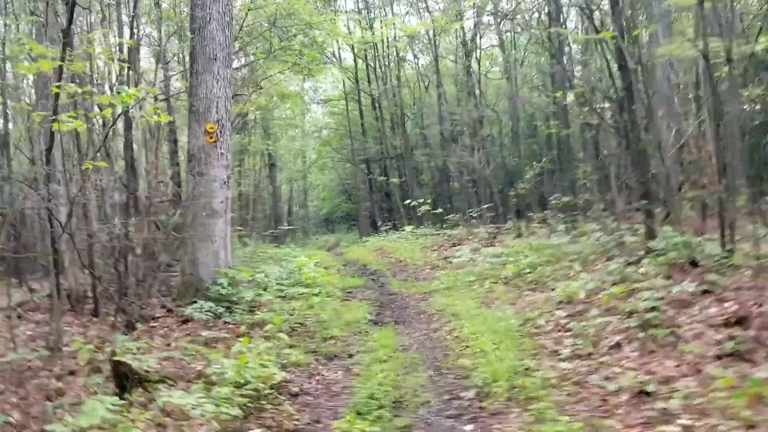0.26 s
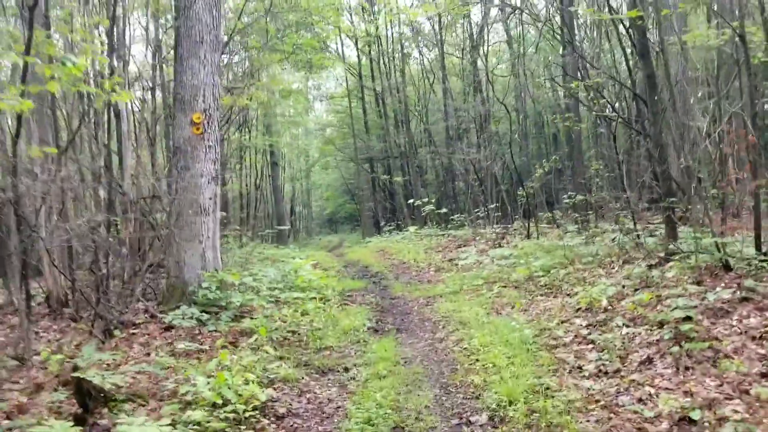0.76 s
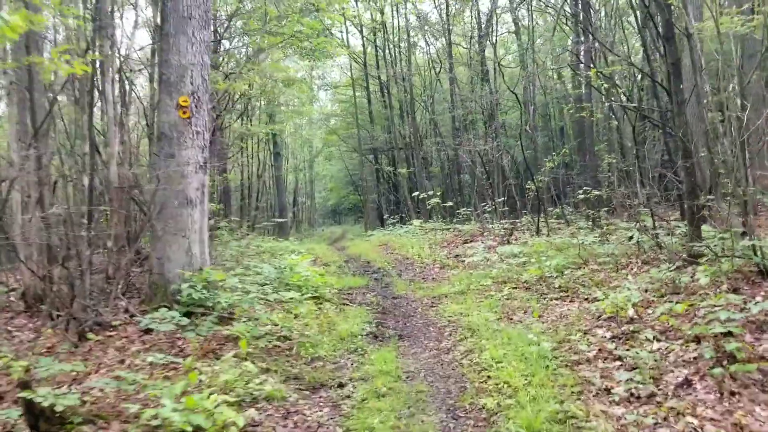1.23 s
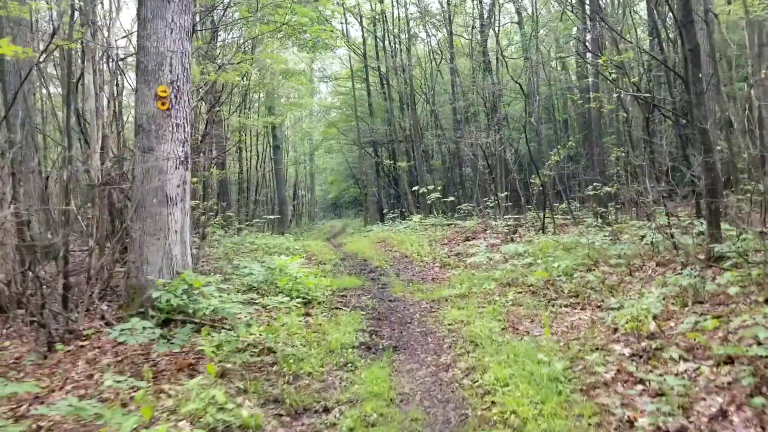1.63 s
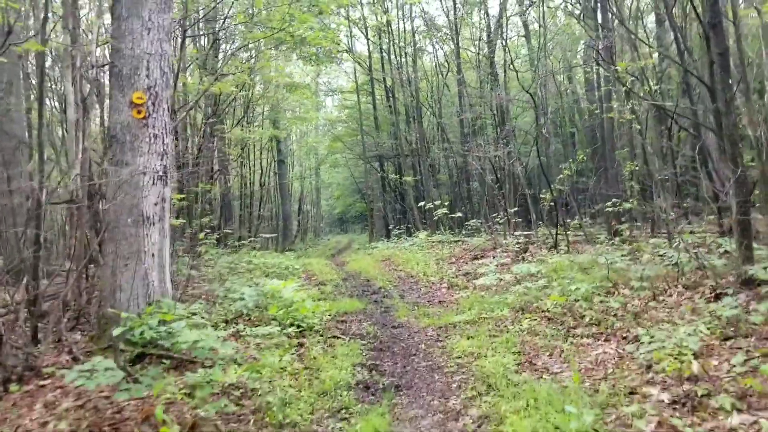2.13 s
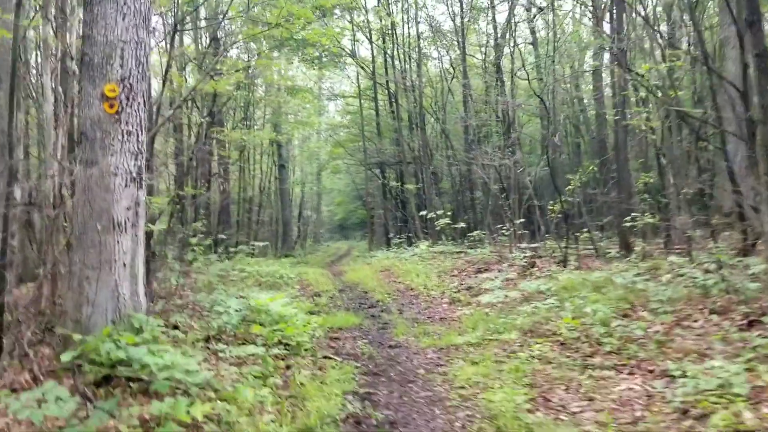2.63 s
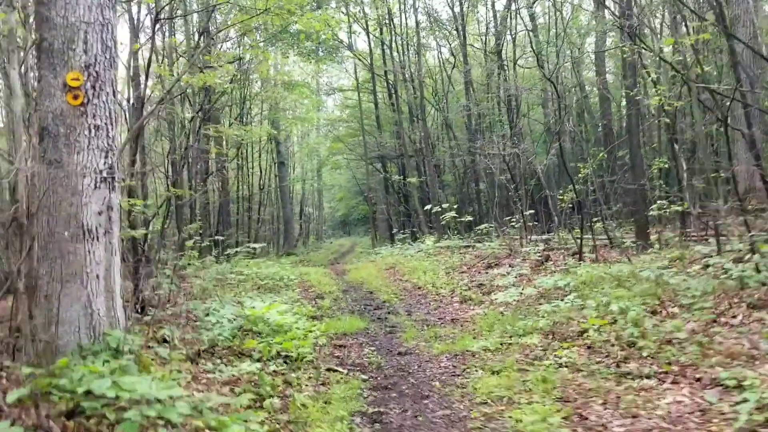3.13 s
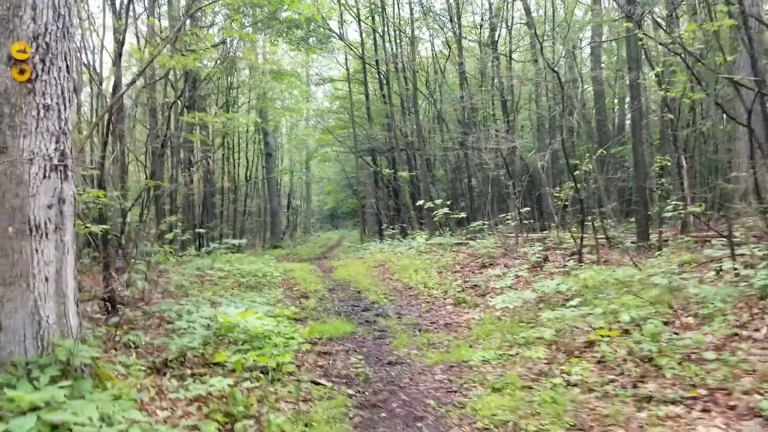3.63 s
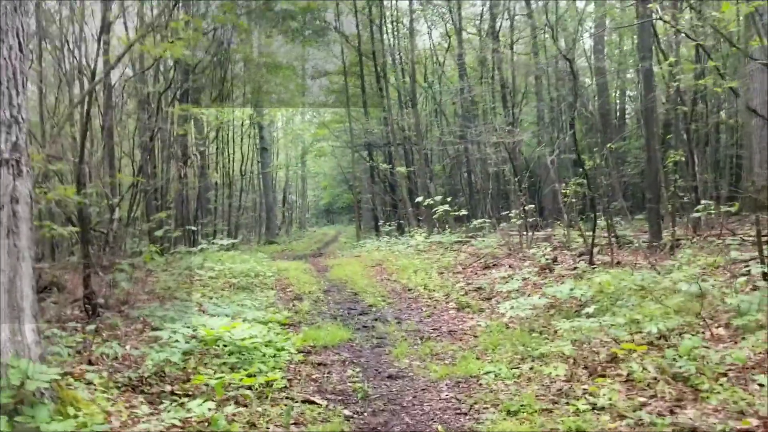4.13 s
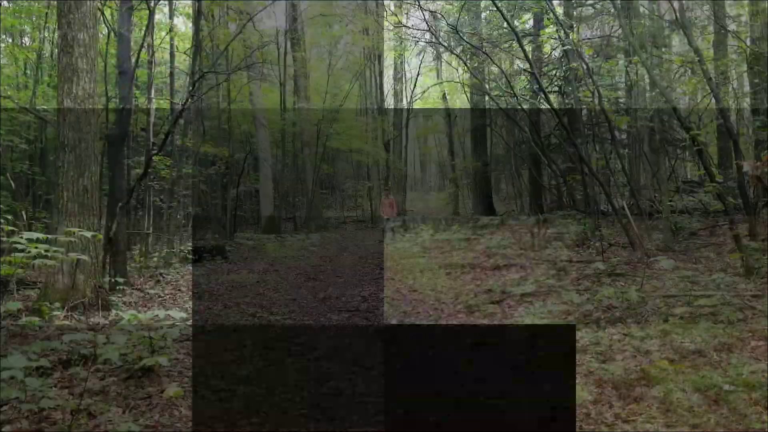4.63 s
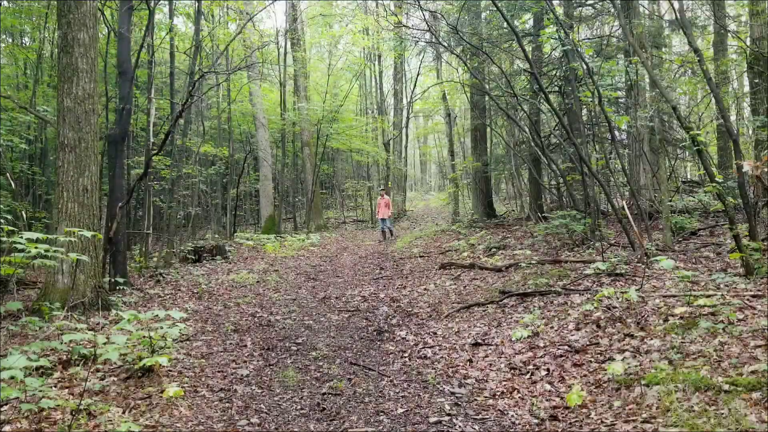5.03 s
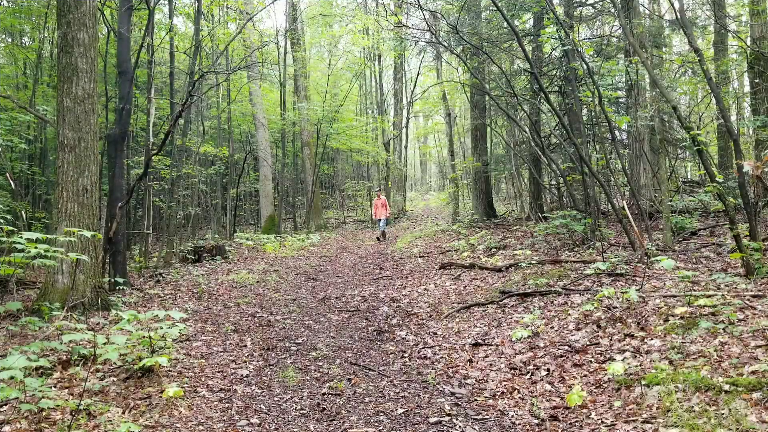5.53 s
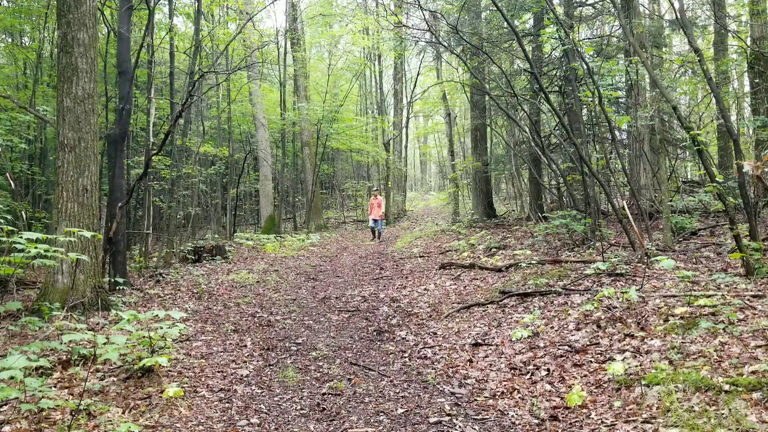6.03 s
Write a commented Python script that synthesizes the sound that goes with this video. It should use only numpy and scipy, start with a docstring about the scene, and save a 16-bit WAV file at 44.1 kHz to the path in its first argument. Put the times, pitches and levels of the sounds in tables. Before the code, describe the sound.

A walk on a damp, leafy forest trail, heard through a hand-held camera. From 0.2 to about 3.1 s, six unhurried footfalls roll heel to sole, with crackling leaves, soft soil thuds and gritty scuffs; dry twigs snap at 0.3, 1.3 and later, over faint rustling. Birds sing throughout this part: echoing sliding whistles until 1.8 s, high thin notes at the start, quick clear swoops at 0.5, 2.1-2.4 and 3.1-3.4 s, and steady held tones. Knocks rattle the camera housing at 3.2 s, a hollow plop follows at 3.4, and a harder knock lands at 3.7 with a rumble surge. More swoops and a knock come around 4.1-4.4 s. At 4.75 s there is a sharp click with a low bump and scrape. Then a low, wavering hum fades in under hiss and rumble, with small ticks, faint reverberant birds at 5.2-5.7 s and rumble swelling at the end.

```python
"""Footsteps walk a damp, leaf-covered forest trail with a hand-held camera, then come to rest.
Leaves, soil and grit sound as coloured trains of tiny fractures, shaped by pressure pulses.
Twigs crack as decaying filtered noise; knocks ring the camera's housing as a bank of resonances.
Birds are gliding sine tones, heard straight and through noise-like echoes among the trunks.
A low rumble, a soft hiss and a late, wavering drone lie beneath."""
import sys
import numpy as np
from scipy import signal
from scipy.fft import rfft, irfft
from scipy.io import wavfile
from scipy.ndimage import uniform_filter1d

SR = 44100
rng = np.random.default_rng(int(sys.argv[2]) if len(sys.argv) > 2 else 0)


def transcribe(u):
    """Save the signal u as a 16-bit wav file named by the first command-line argument.

    u: samples, shape (n,) or (channels, n), limited to [-1, 1]; the rate is SR.
    q: integer samples, one column per channel.
    """
    v = np.clip(np.atleast_2d(u).T, -1, 1)
    q = np.round(v * 32767).astype(np.int16)
    wavfile.write(sys.argv[1], SR, q)


N = 276198
TIME = np.arange(N) / SR


def undb(db):
    """Logarithmic level: 20 dB is a tenfold amplitude."""
    return 10 ** (np.asarray(db) / 20)


def unit(x):
    """Normalization: scale to an rms of 1."""
    return x / np.sqrt(np.mean(x ** 2) + 1e-20)


def envelope(rows):
    """Amplitude envelope: level_db interpolated over time_s, as a gain at every sample."""
    return undb(np.interp(TIME, *np.transpose(rows)))


def add(out, start_s, x):
    """Superposition: mix x into out from start_s, cut at the end."""
    i = max(int(start_s * SR), 0)
    out[i:i + len(x)] += x[:max(N - i, 0)]


def colour(x, points):
    """Spectral shaping: weight x by (frequency_hz, level_db) points, then scale to rms 1."""
    hz, db = np.transpose(points)
    log_hz = np.log(np.fft.rfftfreq(len(x), 1 / SR) + 1)
    # under the first point the amplitude falls with the square of frequency
    low_cut = np.minimum(np.exp(log_hz) / hz[0], 1) ** 2
    gain = low_cut * undb(np.interp(log_hz, np.log(hz), db))
    return unit(irfft(rfft(x) * gain, len(x)))


def resonance(x, hz, width_hz):
    """Resonance: two equal band-pass filters in series, scaled to rms 1."""
    b, a = signal.iirpeak(hz, hz / width_hz, SR)
    once = signal.lfilter(b, a, x)
    return unit(signal.lfilter(b, a, once))


def decay(t, t60):
    """Exponential decay: 60 dB down after t60 seconds."""
    return np.exp(-np.log(1000) * t / t60)


def wander(rate):
    """Random modulation: straight lines between normal draws, rate per second, rms 1."""
    knots = rng.standard_normal(4096)
    return unit(np.interp(TIME * rate, np.arange(len(knots)), knots))


def grains(rate, spread_db):
    """Impulse noise: tiny fractures at random moments, most faint and a few strong."""
    size = undb(spread_db * np.minimum(rng.exponential(size=N), 4.5))
    return (rng.random(N) < rate / SR) * size * rng.choice([-1, 1], N)


def presses(rows, rise):
    """Contact pressure: (start_s, length_s, level_db) pulses add in power; rise is a share of length."""
    power = np.zeros(N)
    for start_s, length_s, level_db in rows:
        u = np.arange(int(2 * length_s * SR)) / (length_s * SR)
        shape = np.sqrt(np.minimum(u / rise, 1)) * np.exp(-u ** 2 - u ** 4)
        add(power, start_s, 2 * (undb(level_db) * shape) ** 2)
    return np.sqrt(power)


# hiss spectrum: frequency_hz [Hz], level_db [dB, relative]
AIR_SPECTRUM = [(120, -2), (200, -5.5), (249, -7.5), (327, -2), (407, -6.5), (506, -7.5), (1170, -20.5),
                (4410, -28), (7480, -32), (8820, -26), (15500, -26)]


def air():
    """Broadband noise: a soft hiss with a barely wavering level."""
    hiss = colour(rng.standard_normal(N), AIR_SPECTRUM)
    return hiss * undb(-61.5 + 0.043 * wander(2.3))


# rumble spectrum: frequency_hz [Hz], level_db [dB, relative]
RUMBLE_SPECTRUM = [(20, -52), (35, -7), (55, -1), (80, 2.5), (105, -9.5), (160, -8), (250, -25),
                   (500, -29.5), (1200, -48)]
# swells of the rumble: time_s [s], level_db [dB, before the 1 dB lift below]
RUMBLE_SWELLS = [(0.0, -59.5), (1.5, -51.5), (1.6, -58.5), (1.66, -51.5), (2.63, -51.5), (2.82, -56.5),
                 (3.1, -51), (3.12, -53.5), (3.77, -52.5), (3.8, -43.5), (4.08, -62), (4.48, -54.5),
                 (6.21, -48.5), (6.26, -44)]


def rumble():
    """Low-frequency noise: an uneven rumble, levelled by its running rms and then swelled."""
    noise = colour(rng.standard_normal(N), RUMBLE_SPECTRUM)
    running_rms = np.sqrt(uniform_filter1d(noise ** 2, size=4000))
    return noise / running_rms * envelope(RUMBLE_SWELLS) * undb(1)


DRONE_FROM_S, DRONE_FADE_S, DRONE_DB = 4.55, 0.74, -53


def drone():
    """Frequency modulation: a wavering hum with narrow-band noise, fading in at the resting place."""
    pitch_hz = 149 * (1 + 0.028 * wander(15))
    hum = np.sin(2 * np.pi * np.cumsum(pitch_hz) / SR)
    breath = resonance(rng.standard_normal(N), hz=167.5, width_hz=133)
    fade = np.clip((TIME - DRONE_FROM_S) / DRONE_FADE_S, 0, 1)
    return undb(DRONE_DB) * unit(hum + undb(-6.5) * breath) * fade


def forest(x, t60):
    """Multiple scattering: trunks return many small echoes that thicken and fade."""
    t = TIME[:2 * SR]
    echoes = rng.standard_normal(len(t)) * (1 - np.exp(-t / 0.0012)) * decay(t, t60)
    return signal.fftconvolve(x, echoes / np.sqrt(np.sum(echoes ** 2)))[:N]


GLIDE_POWER = 1.25  # pitch moves off the turn as this power of time


def glide(turn_hz, far_hz, length_s):
    """Accelerating glide: pitch leaves the turn slowly and gathers speed."""
    progress = np.linspace(0, 1, int(length_s * SR)) ** GLIDE_POWER
    return turn_hz + (far_hz - turn_hz) * progress


def slur(start_hz, glide_in_s, turn_hz, glide_out_s, end_hz):
    """Pitch contour: a note slows into its turning pitch and speeds away from it."""
    approach = glide(turn_hz, start_hz, glide_in_s)[::-1]
    return np.concatenate([approach, glide(turn_hz, end_hz, glide_out_s)])


def hold(start_hz, length_s, end_hz):
    """Linear glide: a held note drifts evenly in pitch."""
    return np.linspace(start_hz, end_hz, int(length_s * SR))


# a note's ends lie this far under its middle, apart from its swell; it starts and stops in NOTE_EDGE_S
NOTE_ARCH_DB, NOTE_EDGE_S = 4, 0.001


def bird(notes, gesture, waver, flutter_db, direct_db, echo_db, t60):
    """Direct and scattered sound: a gliding sine heard straight and by way of the trunks."""
    song, drift = np.zeros(N), 1 + waver * wander(200)
    for start_s, level_db, swell_db, *course in notes:
        pitch_hz = gesture(*course)
        t, along = TIME[:len(pitch_hz)], np.linspace(-1, 1, len(pitch_hz))
        edges = np.clip(np.minimum(t, t[-1] - t) / NOTE_EDGE_S, 0, 1)
        loudness = edges * undb(level_db + swell_db * along / 2 - NOTE_ARCH_DB * along ** 2)
        drifting_hz = pitch_hz * np.interp(start_s + t, TIME, drift)
        phase = 2 * np.pi * np.cumsum(drifting_hz) / SR
        add(song, start_s, np.sqrt(2) * loudness * np.sin(phase))
    # a fast random level flutter roughens the straight path
    flutter = unit(undb(flutter_db * wander(90)))
    return undb(direct_db) * flutter * song + undb(echo_db) * forest(song, t60)


# In all song tables level_db is before the path gains, and swell_db is the rise from start to end.
# slurred notes: start_s [s], level_db [dB], swell_db [dB], start_hz [Hz], glide_in_s [s],
# turn_hz [Hz], glide_out_s [s], end_hz [Hz]
WHISTLER_NOTES = [(.064, -47, -2, 3630, 0.05, 2200, 0.013, 2320),
                  (.165, -53.5, -18, 3593, 0.067, 4174, 0.03, 4070),
                  (.49, -46, 2, 2404, 0.069, 3060, 0.0069, 3030),
                  (.555, -49, -20, 3000, .1, 2106, 0.02, 2070),
                  (.985, -44.5, 1.5, 2700, .055, 3403, 0.087, 2387),
                  (1.22, -48.5, -3, 2564, 0.028, 2490, 0.058, 3830),
                  (1.33, -54.5, -11, 2940, 0.02, 3140, 0.06, 2450),
                  (1.4, -53, 6, 2500, .02, 3200, 0.018, 3160), (1.54, -50, 3, 3050, .04, 3096, .11, 2290),
                  (1.69, -48, -13.5, 2390, 0.087, 3453, 0.059, 3320)]


def whistler():
    """Reverberant slurs: the echoes have a higher gain than the straight path."""
    return bird(WHISTLER_NOTES, slur, waver=.025, flutter_db=10, direct_db=-6.5, echo_db=0.0, t60=1.15)


# held notes: start_s [s], level_db [dB], swell_db [dB], start_hz [Hz], length_s [s], end_hz [Hz]
LOW_NOTES = [(1.19, -57.5, 3, 1724, .19, 1692), (1.9, -50.5, 6, 2155, .06, 2090)]


def low_whistles():
    """Scattered field: low held tones arrive mostly as echo."""
    return bird(LOW_NOTES, hold, waver=0.0069, flutter_db=-3, direct_db=-16, echo_db=1, t60=0.6)


# slurred notes: start_s [s], level_db [dB], swell_db [dB], start_hz [Hz], glide_in_s [s],
# turn_hz [Hz], glide_out_s [s], end_hz [Hz]
FAR_NOTES = [(5.21, -64.5, 1, 4050, 0.04, 3020, 0.011, 2900), (5.28, -71, 10, 2970, 0.1, 2560, 0.051, 3040),
             (5.42, -64.5, 7, 3010, 0.068, 3980, 0.033, 3180),
             (5.52, -69, -2, 3204, 0.032, 2750, 0.15, 3700)]


def far_swooper():
    """Long reverberation: faint slurs linger among the trunks."""
    return bird(FAR_NOTES, slur, waver=0.01, flutter_db=5, direct_db=-3.5, echo_db=0.0, t60=2.7)


# held notes: start_s [s], level_db [dB], swell_db [dB], start_hz [Hz], length_s [s], end_hz [Hz]
THIN_NOTES = [(5.63, -59.5, 0, 9330, .08, 7920)]


def thin_call():
    """Falling tone: one thin high call with a strong pitch waver."""
    return bird(THIN_NOTES, hold, waver=.05, flutter_db=2, direct_db=-8.5, echo_db=-2.5, t60=1.0)


# held notes: start_s [s], level_db [dB], swell_db [dB], start_hz [Hz], length_s [s], end_hz [Hz]
HIGH_NOTES = [(.065, -66, -4, 6900, 0.087, 6740), (.075, -63, 3, 8500, .09, 8400),
              (.18, -58.5, -5, 8070, 0.22, 8050)]


def high_singer():
    """Short reverberation: high held tones with quickly fading echoes."""
    return bird(HIGH_NOTES, hold, waver=.012, flutter_db=4, direct_db=-7, echo_db=-4, t60=0.55)


# slurred notes: start_s [s], level_db [dB], swell_db [dB], start_hz [Hz], glide_in_s [s],
# turn_hz [Hz], glide_out_s [s], end_hz [Hz]
SWOOPER_NOTES = [(.5, -54, 16, 3900, 0.018, 4600, 0.034, 3370),
                 (2.14, -60.5, 31, 3900, 0.032, 5220, 0.055, 3650),
                 (2.27, -52.5, 7.5, 3400, 0.039, 2434, 0.04, 5090),
                 (2.36, -51.5, -7, 3120, 0.06, 2300, 0.009, 2350),
                 (3.142, -57, 10, 4060, 0.0074, 5330, 0.017, 3760),
                 (3.172, -53, 0, 3920, .028, 2916, 0.061, 5270),
                 (3.305, -57.5, 6, 3050, 0.028, 2674, 0.016, 2950),
                 (3.345, -54, -1, 3000, .016, 3464, .036, 2850),
                 (4.11, -69.5, -5, 5400, 0.027, 5070, 0.027, 5650),
                 (4.19, -60, 2, 5400, 0.021, 4800, 0.024, 4730),
                 (4.29, -62.5, -3, 3500, 0.042, 2540, 0.0082, 2530),
                 (4.355, -54, -6, 2500, 0.0055, 2433, 0.098, 4940)]


def swooper():
    """Direct sound: slurs whose straight path has a higher gain than the echoes."""
    return bird(SWOOPER_NOTES, slur, waver=.012, flutter_db=5.0, direct_db=0.5, echo_db=-1.5, t60=0.9)


# held notes: start_s [s], level_db [dB], swell_db [dB], start_hz [Hz], length_s [s], end_hz [Hz]
TWO_TONE_NOTES = [(.3, -58, 0, 4140, 0.2, 4050), (.7, -58.5, -7, 3490, .12, 3490),
                  (.85, -54, -3, 3513, 0.092, 3470), (1.98, -60.5, -6, 3885, 0.135, 3884),
                  (4.01, -62, 6, 4268, .32, 4004), (4.41, -65.5, 3, 3490, 0.33, 3537)]


def two_tone():
    """Steady tones: held notes with little pitch waver."""
    return bird(TWO_TONE_NOTES, hold, waver=0.0044, flutter_db=3.0, direct_db=-1.5, echo_db=1.3, t60=0.62)


def birds():
    """Superposition: the singers add, each with its own balance of straight sound and echo."""
    first_three = whistler() + low_whistles() + far_swooper()
    return first_three + thin_call() + high_singer() + swooper() + two_tone()


# knocks: start_s [s], level_db [dB], tilt_db [dB per octave about 1500 Hz], ring [factor on t60]
HOUSING_KNOCKS = [(3.221, -37.5, 0, 1.2), (3.237, -47.5, 1, 2.4), (3.26, -46, -4.5, 0.59),
                  (3.704, -30.5, 2.5, 1.22), (3.967, -53, -1, 1.84), (4.339, -38.5, 3, 0.85)]
# housing modes: mode_hz [Hz], width_hz [Hz, before widening], mode_db [dB], t60 [s, before ring]
HOUSING_MODES = [(381, 104, -9, 0.72), (446, 27, -2, 0.17), (668, 48, -1.5, 0.24), (827, 164, -15, 0.36),
                 (1195, 280, -8, 0.086), (1650, 240, -14.5, 0.14), (2260, 240, 0, 0.035),
                 (2540, 350, -13, 0.24), (3810, 620, -16.5, 0.16), (5620, 440, -15.5, 0.11),
                 (10500, 3400, -15, 0.075)]
MODE_WIDENING = 1.68


def knocks():
    """Modal ringing: each knock rattles the housing's resonances, the low ones building later."""
    out, t = np.zeros(N), TIME[:16384]
    for start_s, level_db, tilt_db, ring in HOUSING_KNOCKS:
        for mode_hz, width_hz, mode_db, t60 in HOUSING_MODES:
            noise = rng.standard_normal(2 * len(t))
            # the first half lets the filter settle
            rattle = resonance(noise, mode_hz, MODE_WIDENING * width_hz)[len(t):]
            shape = (1 - np.exp(-t * mode_hz / 2.1)) * decay(t, t60 * ring)
            gain = undb(level_db + mode_db + tilt_db * np.log2(mode_hz / 1500))
            add(out, start_s, rattle * shape * gain)
    return out


# hollow plops and bumps: centre_s [s], pitch_hz [Hz], half_s [s, centre to 1/e], level_db [dB, envelope peak]
PLOPS = [(2.072, 400, 0.003, -45), (2.592, 333, 0.0042, -34.5), (2.637, 493, 0.0011, -37.5),
         (3.398, 629, 0.0034, -24), (3.82, 143, 0.0093, -44), (4.097, 1420, 0.00069, -32.5),
         (4.625, 1460, 0.00031, -33.5), (4.753, 186, 0.0038, -26), (4.751, 433, 0.0085, -37),
         (5.199, 2420, 0.0011, -47)]


def plops():
    """Tone bursts: short hollow plops and bumps as sines under brief bell-shaped envelopes."""
    out = np.zeros(N)
    for centre_s, pitch_hz, half_s, level_db in PLOPS:
        t = TIME - centre_s
        out += undb(level_db) * np.exp(-(t / half_s) ** 2) * np.sin(2 * np.pi * pitch_hz * t)
    return out


# thin scrapes of the grip: start_s [s], length_s [s], level_db [dB]
GRIP_SCRAPES = [(4.715, 0.016, -58), (4.73, 0.03, -46.5)]


def scrapes():
    """Friction noise: a high band of noise follows the pressure of the grip."""
    return resonance(rng.standard_normal(N), hz=9300, width_hz=3400) * presses(GRIP_SCRAPES, rise=0.12)


# snapping twigs and dry leaves: start_s [s], level_db [dB], pitch_hz [Hz], t60 [s]
TWIG_SNAPS = [(.275, -36, 8900, 0.011), (.318, -32.5, 11600, 0.013), (1.28, -36, 7640, 0.014),
              (1.808, -43, 10300, 0.026), (2.273, -45.5, 10300, 0.031), (2.895, -40.5, 10000, 0.013),
              (3.003, -43.5, 9600, 0.032), (3.09, -42, 7700, 0.028), (4.27, -37, 9300, 0.0044),
              (2.337, -37, 11000, 0.0049), (5.277, -51, 10000, 0.018), (4.619, -37, 10400, 0.014),
              (4.673, -39.5, 10000, 0.005), (4.7479, -21, 7700, 0.005), (5.197, -42, 8500, .008),
              (5.873, -45, 7700, 0.0086), (5.966, -38.5, 8040, 0.0052)]


def snaps():
    """Brittle fracture: a broad crack with a woody body, gone in milliseconds."""
    out, t = np.zeros(N), TIME[:2048]
    for start_s, level_db, pitch_hz, t60 in TWIG_SNAPS:
        noise = rng.choice([-1., 1.], len(t))
        bright = resonance(noise, pitch_hz, width_hz=4100)
        body = resonance(noise, hz=2440, width_hz=18000)
        crack = unit(bright + undb(-3) * body)
        add(out, start_s, undb(level_db) * crack * decay(t, t60))
    return out


# strides: heel_s [s], heel_thud_db [dB], heel_scuff_db [dB], roll_s [s, heel to sole],
# sole_thud_db [dB], sole_scuff_db [dB], flatten_db [dB, leaves under the sole],
# lead_s [s, crunch before heel], crunch_s [s, length], crunch_db [dB]
STRIDES = [(.208, -72, -50.5, 0.14, -48.5, -55.5, -55.5, 0.05, 0.26, -55.5),
           (.807, -46, -64, 0.11, -51.5, -61, -67, 0.11, 0.11, -46),
           (1.237, -67, -50, 0.19, -48.5, -49, -51.5, -0.015, 0.17, -51.5),
           (1.996, -72, -53.5, 0.045, -53.5, -57, -73, 0.093, 0.13, -55.5),
           (2.507, -51, -49, 0.077, -50, -53, -62, 0.019, 0.14, -58.5),
           (2.946, -60, -73, 0.12, -44, -53, -58, 0.005, 0.056, -48)]
# late crunches, rubs and brushes: start_s [s], length_s [s], leaf_db [dB], thud_db [dB], scuff_db [dB]
RUBS_AND_BRUSHES = [(3.369, 0.063, -57.5, -53.5, -49), (3.689, 0.12, -52.5, -41.5, -69),
                    (3.775, 0.085, -65, -42.5, -65), (3.951, 0.074, -49, -63, -75),
                    (3.986, 0.046, -46, -70, -46), (4.15, 0.31, -63.5, -56.5, -69.5),
                    (4.742, 0.061, -45.5, -44.5, -42.5), (5.27, .07, -57.5, -44.5, -58)]
HEEL_S, SOLE_S = 0.038, 0.084  # how long heel and sole press on the soil
# leaves give way under the sole a little before it meets the soil
FLATTEN_LEAD_S, FLATTEN_S = 0.058, 0.13
# trodden leaves spring back, at this level under the crunch
SETTLE_DB, SETTLE_S = -10, 0.31


def contacts():
    """Heel-to-sole roll, then rubs and brushes: (start_s, length_s, level_db) of leaves, thuds, scuffs."""
    leaf, thud, scuff = [], [], []
    for (heel_s, heel_thud_db, heel_scuff_db, roll_s, sole_thud_db, sole_scuff_db,
         flatten_db, lead_s, crunch_s, crunch_db) in STRIDES:
        touch_s, sole_s = heel_s - lead_s, heel_s + roll_s
        leaf.append((touch_s, crunch_s, crunch_db))
        leaf.append((touch_s + crunch_s / 2, SETTLE_S, crunch_db + SETTLE_DB))
        leaf.append((sole_s - FLATTEN_LEAD_S, FLATTEN_S, flatten_db))
        thud += [(heel_s, HEEL_S, heel_thud_db), (sole_s, SOLE_S, sole_thud_db)]
        scuff += [(heel_s, HEEL_S, heel_scuff_db), (sole_s, SOLE_S, sole_scuff_db)]
    for start_s, length_s, leaf_db, thud_db, scuff_db in RUBS_AND_BRUSHES:
        leaf.append((start_s, length_s, leaf_db))
        thud.append((start_s, length_s, thud_db))
        scuff.append((start_s, length_s, scuff_db))
    return leaf, thud, scuff


# leaf spectrum, also used by rustle(): frequency_hz [Hz], level_db [dB, relative]
LEAF_SPECTRUM = [(500, -5.5), (1200, -5), (2500, -11.5), (5000, -10), (7000, -9.5), (9000, -2.5),
                 (12500, -3), (16000, -5)]


def leaves(rows, bunches):
    """Crackling noise: many small fractures, with a few stiffer stalks standing out."""
    blades = unit(grains(rate=2900, spread_db=0.5))
    stalks = unit(grains(rate=320, spread_db=6.5))
    crackle = colour(blades + undb(-12.5) * stalks, LEAF_SPECTRUM)
    return crackle * bunches * presses(rows, rise=0.24)


# thud spectrum: frequency_hz [Hz], level_db [dB, relative]
THUD_SPECTRUM = [(25, -20), (55, 11), (90, 2), (160, -1), (260, -3), (500, -57), (1500, -56)]


def thuds(rows):
    """Impact noise: a dense, low burst, as of yielding soil."""
    return colour(grains(rate=2700, spread_db=1.5), THUD_SPECTRUM) * presses(rows, rise=0.26)


# scuff spectrum: frequency_hz [Hz], level_db [dB, relative]
SCUFF_SPECTRUM = [(100, 6), (220, -11.5), (380, 0.5), (650, -6.5), (1000, -11.5), (1800, -29), (5000, -29)]


def scuffs(rows):
    """Granular friction: sparser, more uneven grains, as of grit, with a quick onset."""
    return colour(grains(rate=1200, spread_db=4.5), SCUFF_SPECTRUM) * presses(rows, rise=0.1)


# rustle of clothes and undergrowth: time_s [s], level_db [dB, before its random modulation]
RUSTLE_LEVEL = [(0, -65), (.4, -69), (1.4, -65), (2.8, -66), (4.3, -72), (4.9, -68)]


def rustle(bunches):
    """Amplitude-modulated noise: clothes and undergrowth rustle in uneven bunches."""
    crackle = colour(grains(rate=2500, spread_db=4), LEAF_SPECTRUM)
    return crackle * envelope(RUSTLE_LEVEL) * bunches * undb(2 * wander(20))


def footsteps():
    """Contact sound: leaves crackle, soil thuds and grit scuffs; rubs and brushes share these noises."""
    leaf_rows, thud_rows, scuff_rows = contacts()
    # leaves give way in little bunches
    bunches = unit(undb(2.8 * wander(170)))
    return leaves(leaf_rows, bunches) + thuds(thud_rows) + scuffs(scuff_rows) + rustle(bunches)


def scene():
    """Superposition: all sources meet at one microphone."""
    walking = footsteps() + snaps()
    bumps = knocks() + plops() + scrapes()
    singing = birds()
    background = air() + rumble() + drone()
    return (walking + bumps + singing + background)[None]


def record(dry):
    """Band limiting: a steep low-pass in the camera cuts the top above 15750 Hz."""
    low_pass = signal.ellip(10, .2, 70, 15750, fs=SR, output="sos")
    return signal.sosfilt(low_pass, dry)


dry = scene()
out = record(dry)
transcribe(out)
```